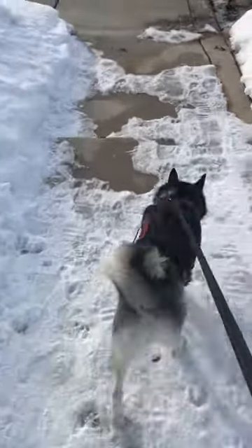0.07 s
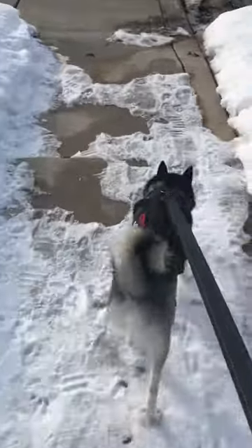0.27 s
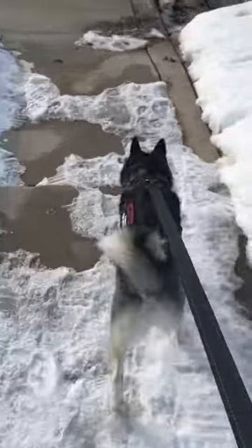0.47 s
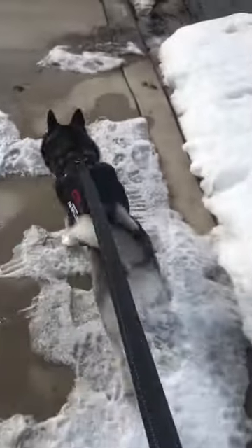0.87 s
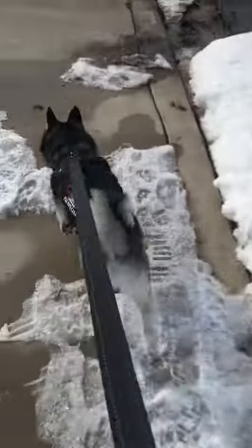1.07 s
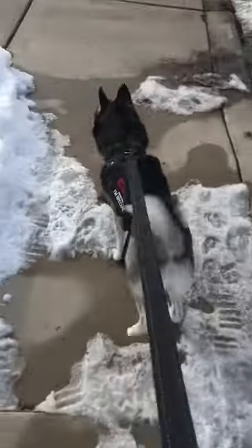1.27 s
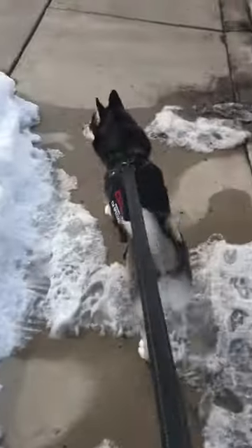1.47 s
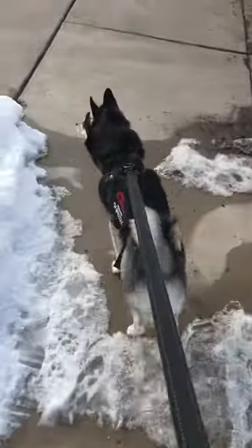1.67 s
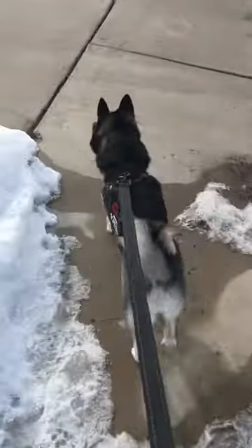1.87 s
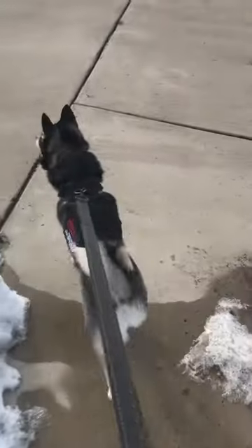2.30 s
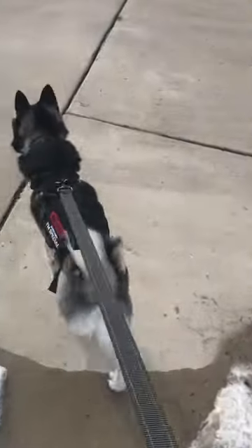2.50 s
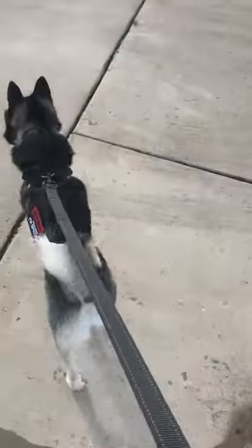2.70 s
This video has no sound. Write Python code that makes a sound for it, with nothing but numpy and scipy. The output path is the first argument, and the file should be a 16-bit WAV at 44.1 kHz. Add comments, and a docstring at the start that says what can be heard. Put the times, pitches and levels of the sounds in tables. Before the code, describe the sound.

Close to the microphone, a walker's steps crush wet snow and snap bits of ice crust before reaching gritty concrete. Light claw ticks from a dog fall between the steps, with a faint outdoor rumble underneath.

```python
"""Outdoors on trodden, melting snow, then bare concrete; one microphone close to a walker following a dog.
About two steps a second: each is a few bursts of crushed grains, with a heel thud and a slap of the sole.
On the concrete it is grit that scrapes. Ice crusts snap, soles and pads rasp, the dog's claws tick,
and a low, distant rumble lies under it all."""
import sys
import numpy as np
from scipy import signal
from scipy.fft import rfft, irfft, next_fast_len
from scipy.io import wavfile
from scipy.ndimage import map_coordinates

SR = 44100
rng = np.random.default_rng(int(sys.argv[2]) if len(sys.argv) > 2 else 0)


def master(y):
    """Save y as 16-bit WAV."""
    cut = np.clip(np.atleast_2d(y).T, -1, 1)
    pcm = np.round(cut * 32767)  # scale
    wavfile.write(sys.argv[1], SR, pcm.astype(np.int16))


N = 125685
TIME = np.arange(N) / SR

# The bright spectrum of claw ticks and slush. Each row: frequency in Hz, relative level in dB.
CLICK_SPECTRUM = [(200, -30), (1500, -12), (3300, 0), (6000, 0), (10000, -2), (16000, -3)]


def amp(db):
    return 10 ** (np.asarray(db) / 20)


def rms(x):
    return np.sqrt(np.mean(x ** 2) + 1e-20)


def unit(x):
    return x / rms(x)


def add(track, start_s, x):
    """Mix x into the track from start_s on."""
    i = max(0, round(start_s * SR))
    track[i:i + len(x)] += x[:max(0, N - i)]


def wobble(per_s):
    """A smooth random curve with per_s knots a second."""
    return map_coordinates(rng.standard_normal(4096), [TIME * per_s], mode="wrap")


def colour(x, spectrum):
    """A minimum-phase filter of unit power, shaped by (Hz, dB) points."""
    size = 4096
    hz, db = np.transpose(spectrum)
    gain = amp(np.interp(np.log(np.fft.rfftfreq(size, 1 / SR) + 1), np.log(hz), db))
    cepstrum = irfft(np.log(gain))
    cepstrum[1:size // 2] *= 2
    cepstrum[size // 2 + 1:] = 0
    response = irfft(np.exp(rfft(cepstrum)))
    return signal.fftconvolve(x, response / np.linalg.norm(response))[:len(x)]


def resonate(x, hz, q, low_hz):
    """A resonant low-pass with its bass rolled off below low_hz."""
    size = next_fast_len(len(x) + 4096)
    s = 1j * np.fft.rfftfreq(size, 1 / SR)
    low_pass = 1 / (1 + s / (hz * q) + (s / hz) ** 2)
    bass_cut = (s / (s + low_hz)) ** 2
    return irfft(rfft(x, size) * low_pass * bass_cut, size)[:len(x)]


def grains(per_s=6000, spread_db=5):
    """Random tiny fractures of uneven size."""
    happens = rng.random(N) < per_s / SR
    polarity = np.sign(rng.standard_normal(N))
    strength = amp(spread_db * np.clip(rng.standard_normal(N), -2, 2))
    return unit(happens * polarity * strength)


def decay(t, t60_s):
    return amp(-60 * t / t60_s)


def impact(t, rise_s, t60_s):
    """An envelope that rises, peaks at 1 and dies away."""
    shape = (1 - np.exp(-t / rise_s)) * decay(t, t60_s)
    return shape / shape.max()


def outdoors():
    """Far from the microphone: a slightly wavering wash of noise and an uneven low rumble."""
    # The distant wash. Each row: frequency in Hz, relative spectral density in dB.
    air_spectrum = [(20, -30), (50, 3), (90, 1), (230, -3), (450, -9.5), (750, -11), (1150, -10),
                    (2000, -18), (3700, -20), (5000, -24.5), (9000, -28.5), (16000, -31)]
    air = colour(rng.standard_normal(N), air_spectrum) * amp(-57 + 1.2 * wobble(per_s=12))
    rumble = unit(resonate(rng.standard_normal(N), hz=80, q=3, low_hz=60))
    return air + rumble * amp(-61 + 1.8 * wobble(per_s=14))


def crunches():
    """Each press breaks grains: a hollow body, dull packing, dry grit and a microphone-coloured wet fizz."""
    # Shoes and paws pressing or scraping the ground. Each row: start, rise and hold in seconds,
    # fade in seconds per 20 dB, body level in dB, body pitch in Hz, grit level and fizz level in dB.
    presses = [ (.0, .003, .02, .07, -55, 1300, -63, -57), (.098, .005, .023, .03, -67, 1200, -65, -56),
               (.201, .011, .004, .035, -64, 1200, -60, -51), (.232, .035, .025, .05, -63, 1400, -62, -59),
               (.341, .005, .013, .05, -42, 900, -47, -46), (.363, .012, .023, .035, -53, 1100, -48, -50),
               (.427, .014, .033, .025, -43, 1300, -43, -48), (.448, .009, .012, .018, -35, 1500, -42, -46),
               (.478, .01, .02, .19, -58, 1300, -58, -56), (.592, .015, .025, .2, -65, 1200, -59, -64),
               (.685, .01, .025, .02, -66, 1200, -63, -63), (.812, .002, .009, .022, -40, 900, -42, -48),
               (.823, .006, .03, .07, -39, 930, -49, -46), (.878, .003, .007, .009, -34, 950, -49, -44),
               (.895, .028, .015, .09, -45, 1050, -53, -50), (.97, .06, .07, .1, -65, 1100, -62, -58),
               (1.093, .01, .01, .02, -60, 1400, -56, -62), (1.168, .004, .014, .025, -58, 700, -57, -52),
               (1.2, .015, .017, .04, -64, 1300, -55, -48), (1.227, .005, .02, .025, -56, 1900, -49, -62),
               (1.311, .007, .036, .05, -52, 750, -59, -66), (1.36, .008, .052, .06, -43, 1000, -49, -51),
               (1.436, .005, .028, .06, -48, 750, -49, -50), (1.47, .02, .03, .25, -54, 1100, -61, -65),
               (1.608, .017, .008, .04, -63, 1000, -58, -66), (1.66, .02, .025, .04, -60, 1200, -61, -74),
               (1.785, .012, .03, .04, -72, 1200, -62, -58), (1.838, .012, .018, .03, -50, 700, -47, -50),
               (1.86, .028, .01, .06, -39, 1050, -39, -41), (1.926, .003, .014, .07, -44, 1300, -45, -48),
               (1.96, .035, .025, .22, -50, 1150, -53, -56), (2.05, .018, .03, .08, -48, 1100, -56, -64),
               (2.185, .003, .005, .045, -54, 900, -58, -66), (2.388, .002, .014, .04, -50, 1300, -51, -60),
               (2.428, .014, .01, .03, -58, 1300, -57, -70), (2.47, .022, .012, .05, -48, 500, -48, -59),
               (2.573, .002, .008, .08, -58, 700, -52, -62), (2.594, .014, .005, .028, -53, 2200, -45, -63),
               (2.6, .035, .02, .11, -53, 650, -55, -64), (2.678, .012, .025, .1, -58, 1100, -59, -68), ]
    # Dry grit. Each row: frequency in Hz, relative level in dB.
    grit_spectrum = [(100, -45), (800, -17), (1400, -1), (2100, -1), (3600, -1), (4400, -6), (5200, -14),
                     (16000, -40)]
    # Wet fizz heard through the microphone's notches at 4.9, 7.6 and 10.4 kHz.
    # Each row: frequency in Hz, relative level in dB.
    fizz_through_mic = [(100, -40), (2500, -18), (4300, -2), (4900, -5), (5600, 2), (7000, 2), (7600, -3),
                        (9000, 0), (10400, -5), (12000, -1), (16000, -2)]
    pack_below_body_db, bounce_share = 8.5, .3
    clumps = amp(2.7 * wobble(per_s=380))  # grains give way in small avalanches
    breaks = clumps * grains()
    pack = resonate(clumps * grains(), hz=340, q=1.3, low_hz=130)  # the ground packing under the foot
    grit = colour(clumps * grains(), grit_spectrum)
    fizz = colour(clumps * grains(per_s=14000, spread_db=4.5), fizz_through_mic)
    out, t = np.zeros(N), TIME[:SR // 2]
    for start, rise, hold, fade, body_db, hz, grit_db, fizz_db in presses:
        shape = np.minimum(t / rise, 1) * amp(-20 * np.maximum(t - rise - hold, 0) / fade)
        patch = rng.integers(N - len(t)) + np.arange(len(t))
        body = resonate(breaks[patch], hz, q=1.6, low_hz=.22 * hz)
        bounce_lag = round(rng.uniform(.0004, .002) * SR)  # a reflection off shoe and leg
        layers = [(body, body_db), (pack[patch], body_db - pack_below_body_db),
                  (grit[patch], grit_db), (fizz[patch], fizz_db)]
        for layer, db in layers:
            bounced = layer + bounce_share * np.roll(layer, bounce_lag)
            add(out, start, amp(db) * unit(bounced * shape) * rms(shape))
    return out


def slush():
    """A thin, patchy crackle under the paws, fading out where the snow ends."""
    snow_ends_s, fade_s = 1.55, .3
    crackle = colour(grains(per_s=500, spread_db=7), CLICK_SPECTRUM)
    patches = amp(2.5 * wobble(per_s=35))
    on_snow = np.clip(1 - (TIME - snow_ends_s) / fade_s, 0, 1)
    return amp(-67) * unit(crackle * patches) * on_snow


def yard_scatter(x):
    """The surroundings send a short, dull tail back to the microphone."""
    t = TIME[:SR // 2]
    tail = resonate(rng.standard_normal(len(t)), hz=5000, q=.6, low_hz=100)
    tail *= impact(t, rise_s=.006, t60_s=.3)
    return signal.fftconvolve(x, tail / np.linalg.norm(tail))[:N]


def sole_slaps():
    """A sole or paw closing flat on the ground gives a pop whose pitch drops within milliseconds."""
    # Flat landings. Each row: start in seconds, peak level in dB, starting pitch in Hz.
    slaps = [(.2355, -34, 500), (.3115, -36, 650), (.699, -43, 500), (.8255, -35, 500), (1.4165, -37, 700),
             (1.4415, -35, 600), (1.703, -41, 600), (1.928, -24, 1000), (2.0855, -33, 1100),
             (2.3888, -36, 1400), (2.4634, -22.3, 1500)]
    end_hz, glide_s = 170, .0012
    out, t = np.zeros(N), TIME[:SR // 4]
    shape = impact(t, rise_s=.0004, t60_s=.024)
    for start, db, start_hz in slaps:
        pitch = end_hz + (start_hz - end_hz) * np.exp(-t / glide_s)
        add(out, start, -amp(db) * shape * np.sin(2 * np.pi * np.cumsum(pitch) / SR))
    return out


def heel_thuds():
    """The walker's weight lands on the heel: a low, damped tone, its pitch a little different each time."""
    # Heel landings. Each row: start in seconds, peak level in dB.
    thuds = [(.237, -41), (.817, -38), (1.035, -46), (1.565, -47), (1.85, -43), (1.885, -44), (2.397, -36),
             (2.465, -47), (2.553, -46), (2.59, -46)]
    out, t = np.zeros(N), TIME[:SR // 4]
    shape = impact(t, rise_s=.004, t60_s=.08)
    for start, db in thuds:
        hz = 88 * (1 + .08 * rng.standard_normal())
        add(out, start, amp(db) * shape * np.sin(2 * np.pi * hz * t))
    return out


def rasps():
    """Rubber and pads slide on ice or grit: fine slips ring one resonance, swelling and dying."""
    # Slides. Each row: time of the peak and width in seconds, level in dB, pitch in Hz.
    slides = [(.278, .006, -52, 2900), (.625, .012, -58, 3600), (1.11, .005, -53, 3400),
              (1.176, .007, -50, 3400), (1.628, .008, -55, 3500), (1.873, .014, -42, 3300),
              (2.12, .06, -63, 5300), (2.498, .012, -50, 2300), (2.745, .02, -58, 2200)]
    out, t = np.zeros(N), TIME[:SR // 2] - .25
    slips = grains()
    for peak_s, width, db, hz in slides:
        shape = np.exp(-.5 * (t / width) ** 2)
        patch = rng.integers(N - len(t)) + np.arange(len(t))
        band = signal.lfilter(*signal.iirpeak(hz, Q=5, fs=SR), slips[patch])
        add(out, peak_s + t[0], amp(db) * unit(band * shape) * rms(shape))
    return out


def crust_snaps():
    """A bit of crust or grit breaks: a few damped cycles and a noisy crack."""
    # Larger fractures. Each row: start in seconds, level in dB, pitch in Hz.
    snaps = [(.396, -30, 2600), (.4305, -28, 1500), (.4585, -25, 1500), (.467, -25, 1700),
             (1.407, -28, 1700), (1.529, -40, 2000), (1.315, -39, 1500), (1.757, -40, 1700),
             (1.9065, -24, 1100), (1.946, -26, 1500), (1.997, -35, 1400), (2.0172, -27, 1200),
             (2.188, -37, 800), (2.608, -34, 2400)]
    out, t = np.zeros(N), TIME[:SR // 20]
    for start, db, hz in snaps:
        ring = np.sin(2 * np.pi * hz * t)
        crack = amp(-12) * rng.standard_normal(len(t))
        add(out, start, amp(db) * decay(t, t60_s=.006) * (ring + crack))
    return out


def claw_ticks():
    """Claws strike ice and concrete: each gives a bright click and a brief ring of its own."""
    # Claw strikes. Each row: start in seconds, peak level of the click in dB.
    ticks = [(.5595, -32), (.577, -42), (.59, -44), (.607, -43), (1.043, -39), (1.112, -39), (1.172, -28),
             (1.185, -37), (1.308, -44), (1.58, -42), (1.635, -43), (1.7995, -33), (1.821, -38),
             (2.265, -45), (2.473, -36), (2.797, -47), (2.83, -46)]
    out, t = np.zeros(N), TIME[:SR // 20]
    for start, db in ticks:
        click = colour(rng.standard_normal(len(t)) * decay(t, t60_s=.0045), CLICK_SPECTRUM)
        ring_hz = rng.uniform(3000, 7000)
        ring = amp(-13) * np.sin(2 * np.pi * ring_hz * t) * decay(t, t60_s=.012)
        add(out, start, amp(db) * (click / np.abs(click).max() + ring))
    return out


def scene():
    """Walker and dog close by in the open air, in mono, with a faint scatter behind them."""
    steps = crunches() + rasps() + sole_slaps() + heel_thuds() + crust_snaps() + claw_ticks() + slush()
    return (steps + amp(-22) * yard_scatter(steps) + outdoors())[None]


def record(dry):
    """The recorder keeps nothing above its band limit."""
    top_hz = 15900
    size = next_fast_len(N + SR // 2)
    in_band = np.fft.rfftfreq(size, 1 / SR) < top_hz
    return irfft(rfft(dry, size) * in_band, size)[:, :N]


dry = scene()
out = record(dry)
master(out)
```